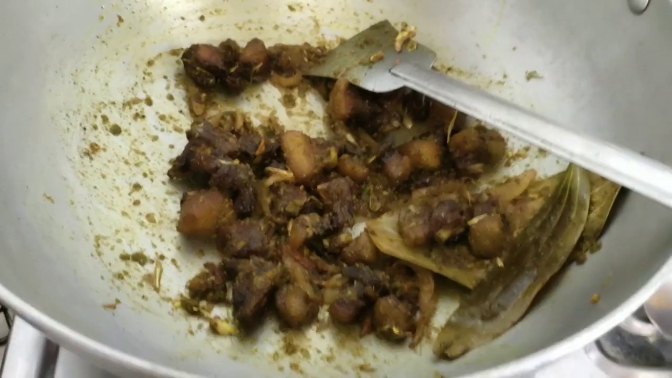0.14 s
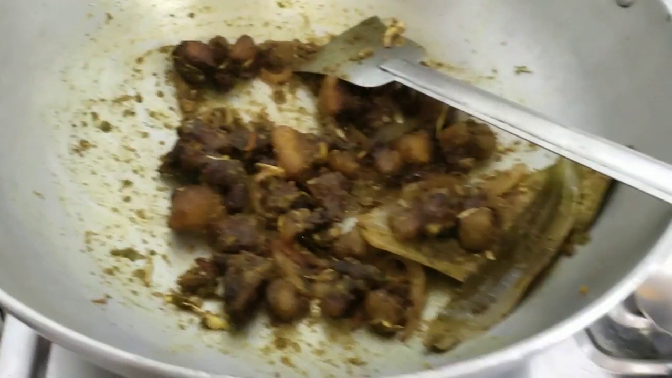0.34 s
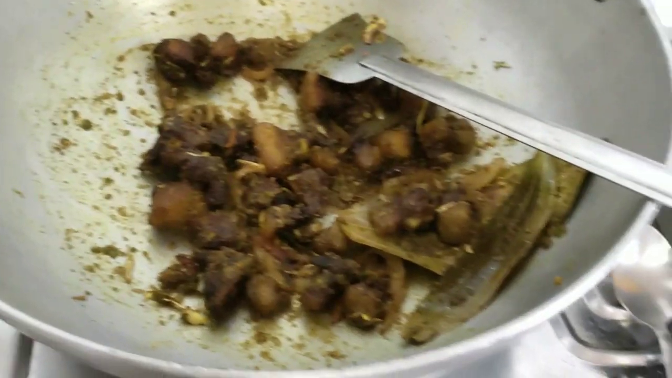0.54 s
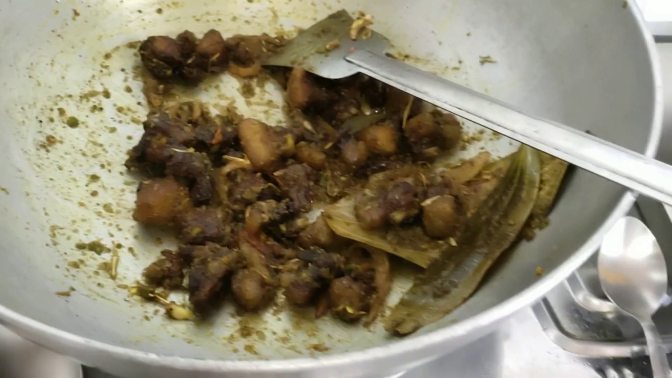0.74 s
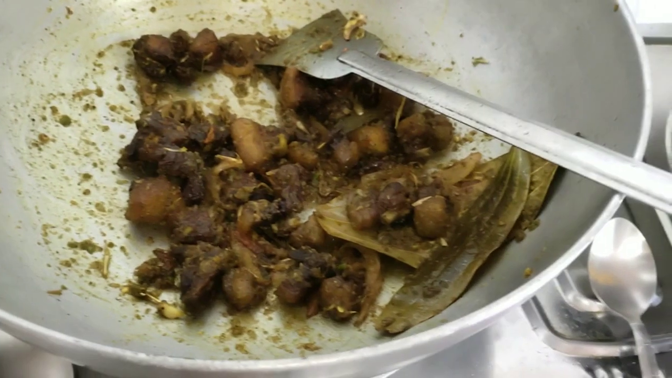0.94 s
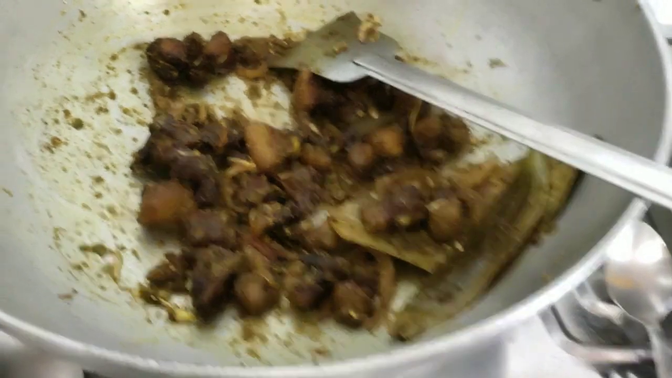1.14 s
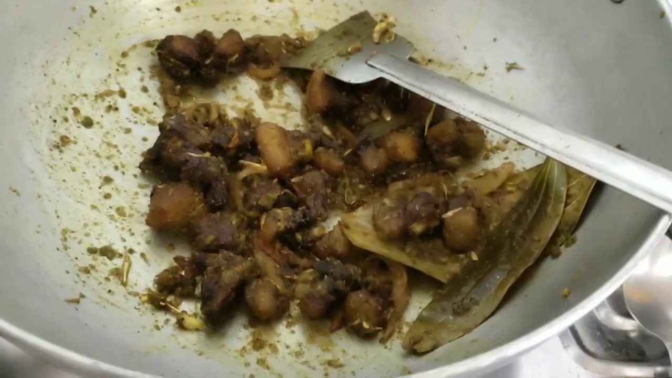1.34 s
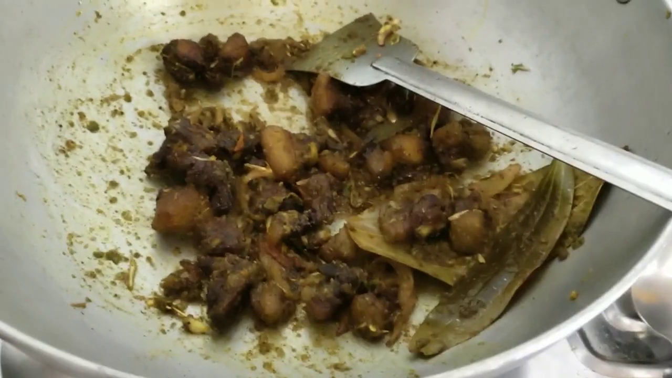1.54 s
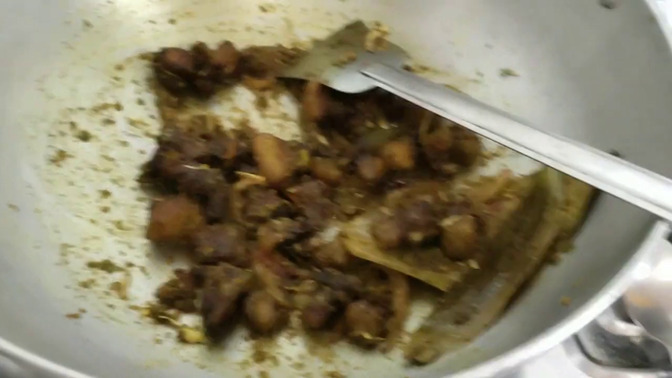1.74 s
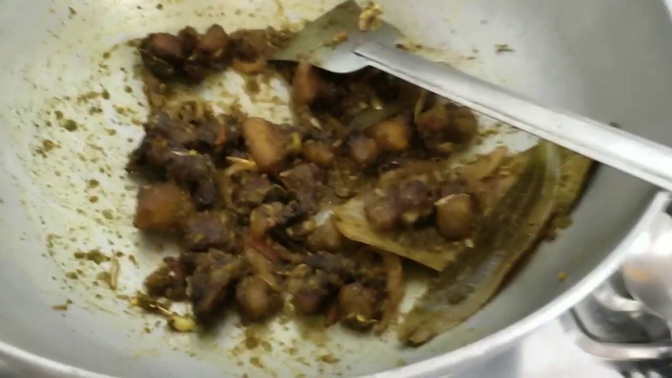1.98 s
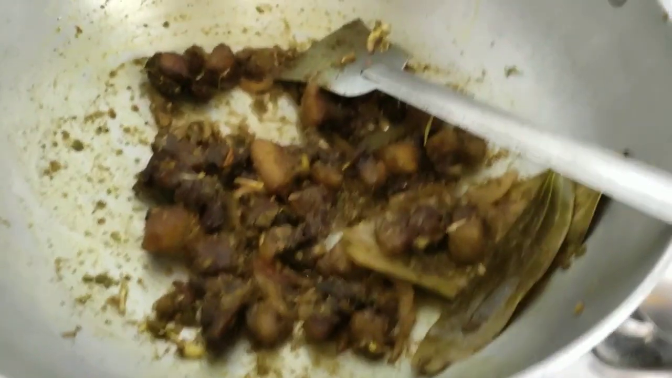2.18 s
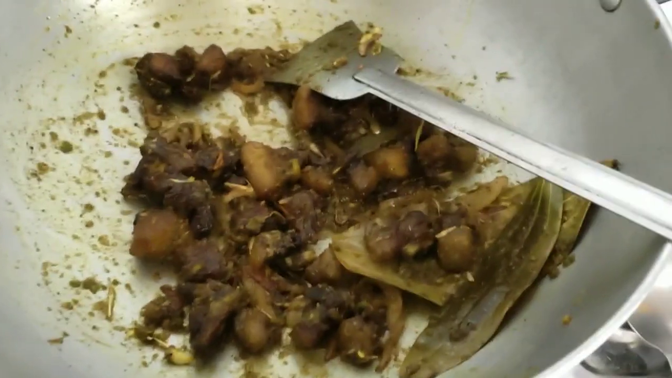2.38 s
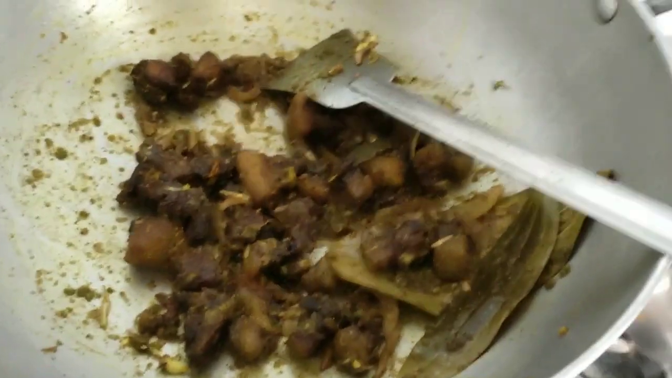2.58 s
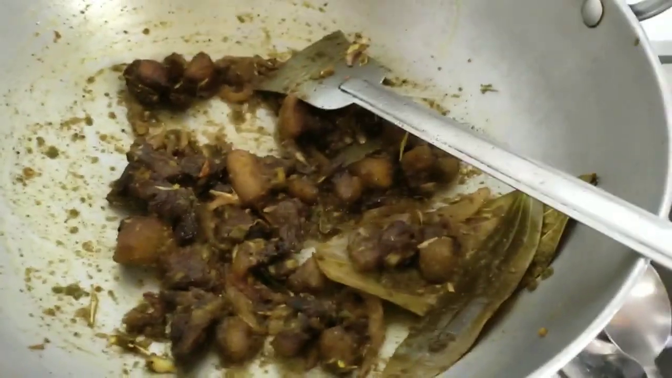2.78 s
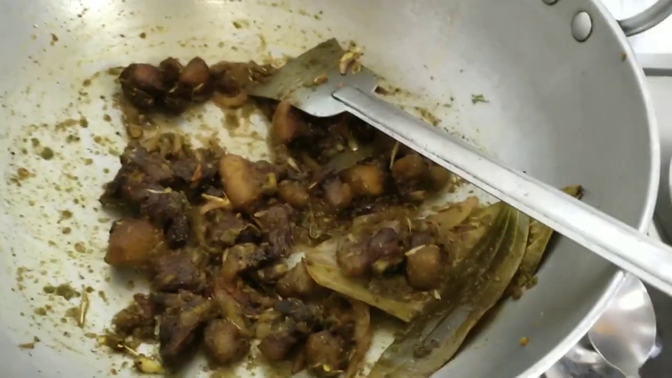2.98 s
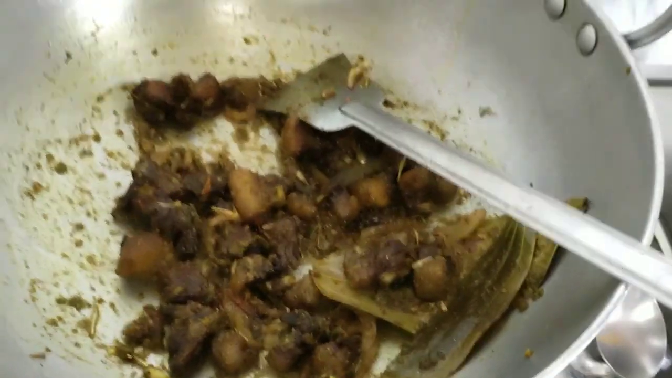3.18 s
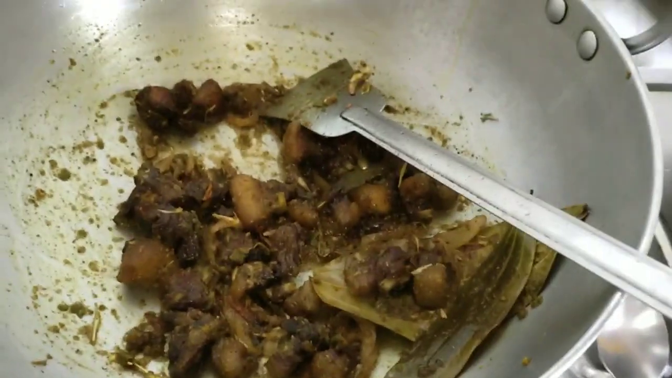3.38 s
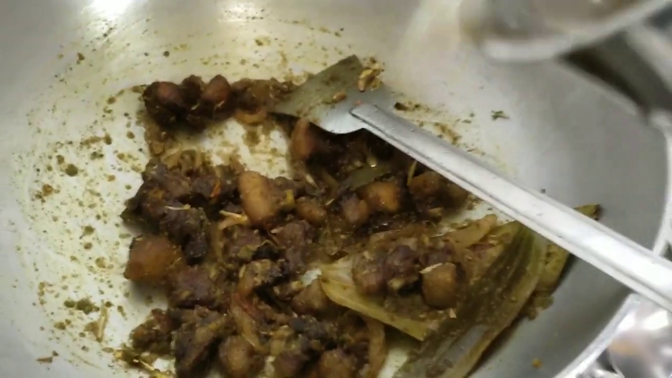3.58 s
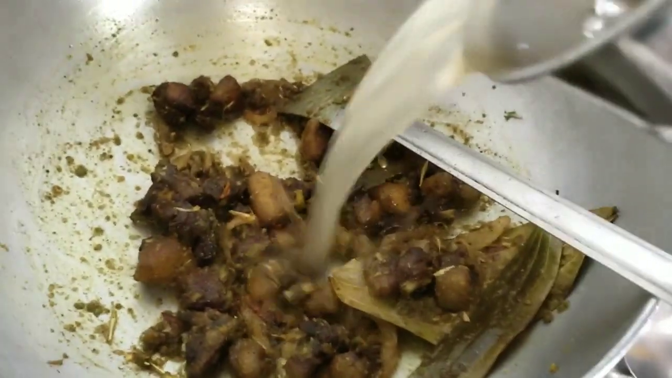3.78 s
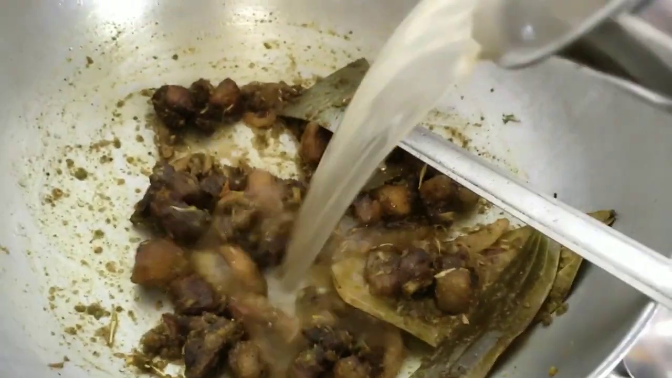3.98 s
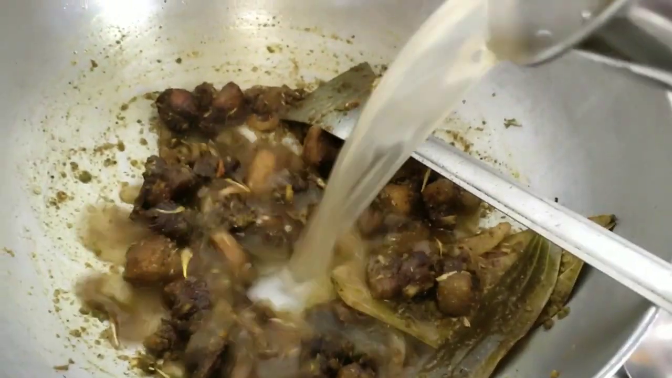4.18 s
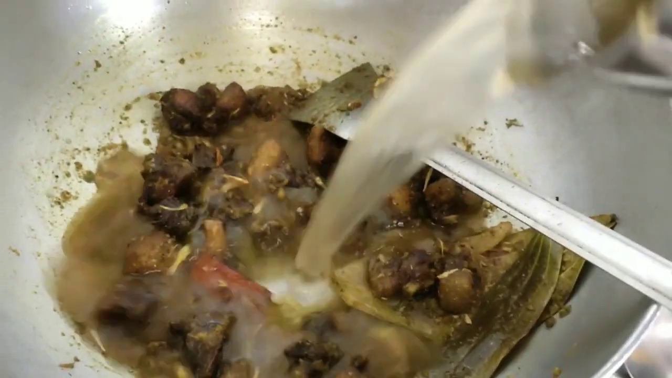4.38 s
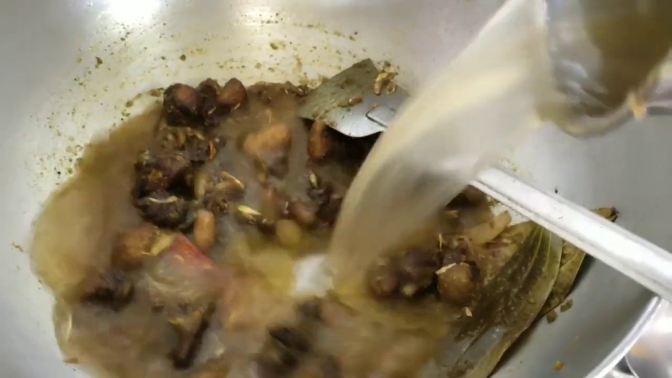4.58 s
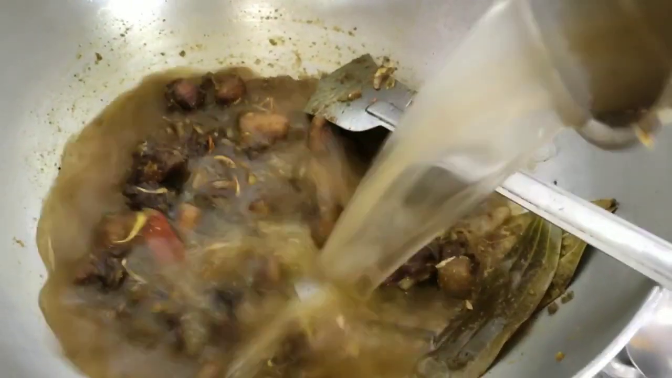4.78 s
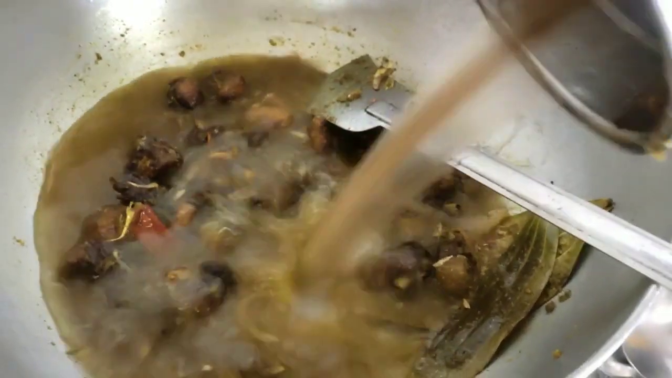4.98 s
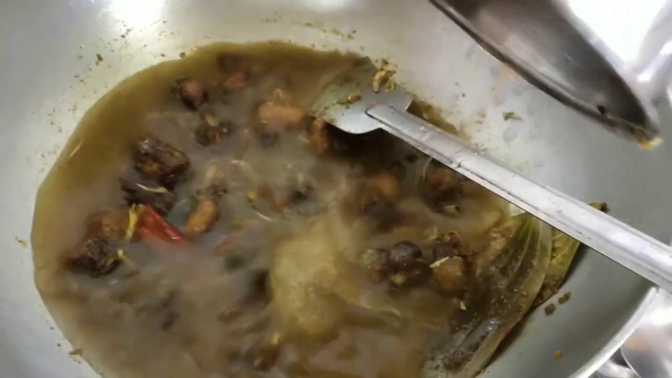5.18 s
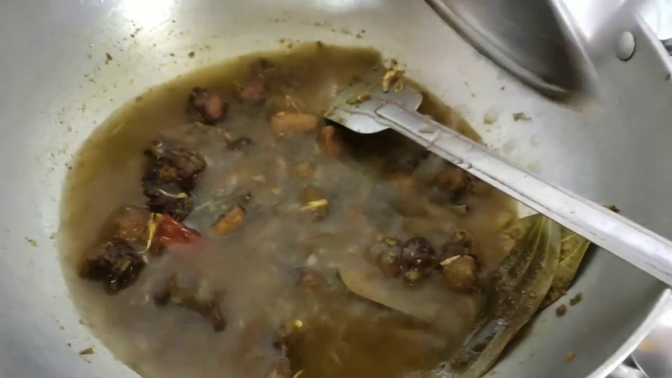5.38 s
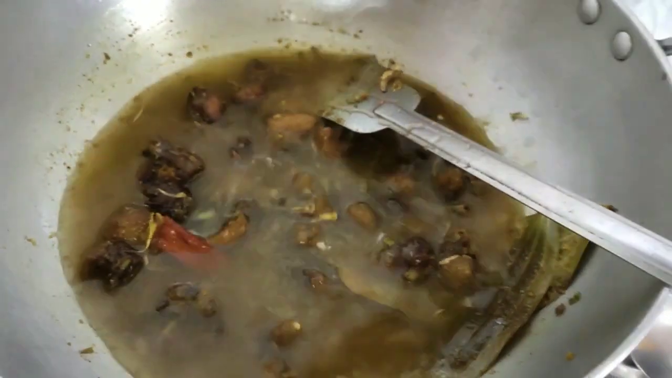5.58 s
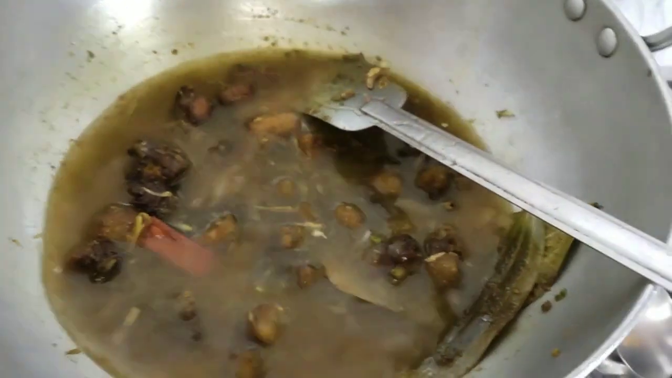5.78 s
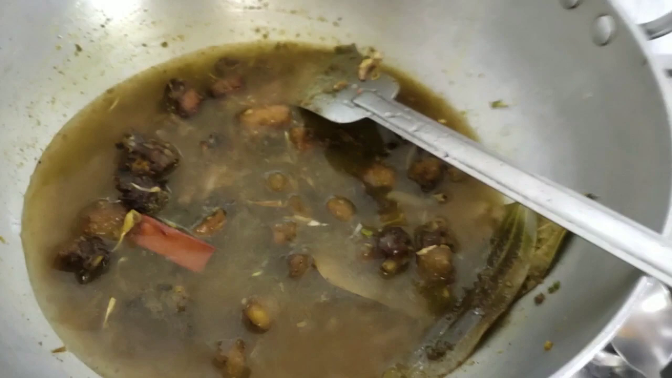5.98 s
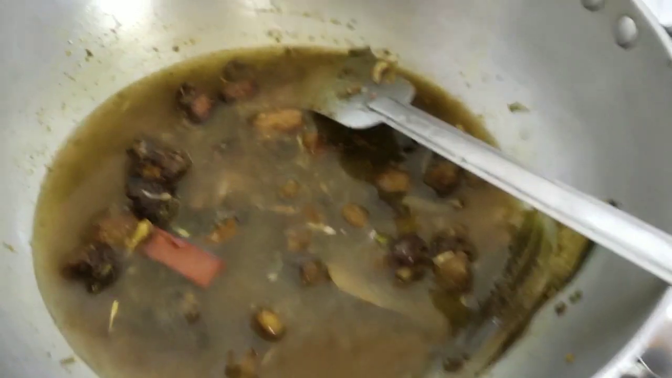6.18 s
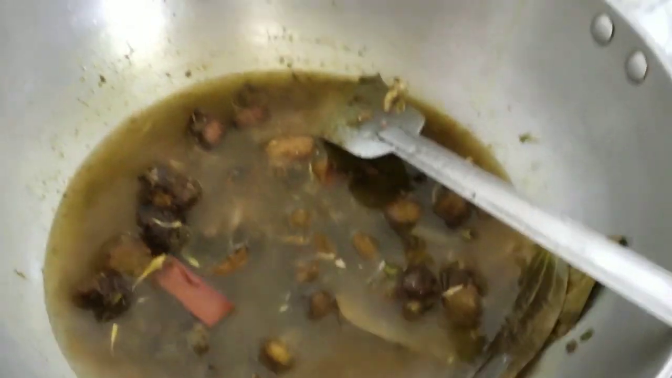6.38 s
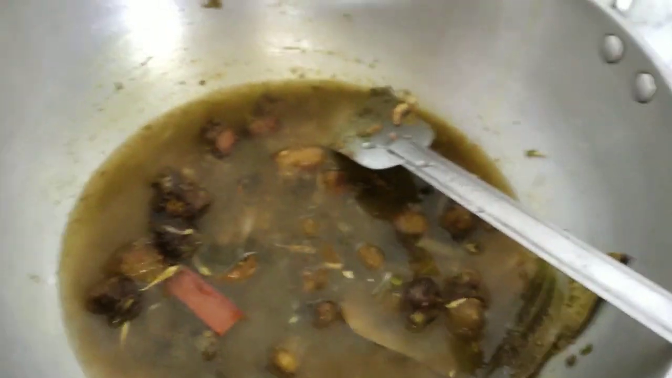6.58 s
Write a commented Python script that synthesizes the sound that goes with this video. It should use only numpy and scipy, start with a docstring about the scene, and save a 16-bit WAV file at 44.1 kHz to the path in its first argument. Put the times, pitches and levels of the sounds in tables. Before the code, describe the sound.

A steel pot clangs and scrapes beside quietly frying meat, then poured water bursts into a loud sizzling hiss that settles into bubbling.

```python
"""A steel pot clangs, is put down, dragged and lifted beside pork frying quietly in a metal wok on gas.
Blows excite clusters of decaying modes and noise bursts; dragging drives base resonances with random slips.
Fat pops are filtered impulses and short rings, over a low stove rumble, room tone and faint hums.
Then the pot's water splashes in, flashes into loud filtered-noise steam and boils as ringing bubbles,
which settle towards a simmer. Small hard-walled kitchen, one close microphone."""
import sys
import numpy as np
from scipy import signal
from scipy.fft import rfft, irfft
from scipy.io import wavfile

SR = 44100
rng = np.random.default_rng(int(sys.argv[2]) if len(sys.argv) > 2 else 0)


def dump(signal):
    """Clip the signal to [-1, 1] and save it as 16-bit WAV at the path in sys.argv[1]."""
    limited = np.clip(np.atleast_2d(signal).T, -1, 1)
    pcm = np.round(limited * 32767).astype(np.int16)
    wavfile.write(sys.argv[1], SR, pcm)


N = 292691
TIME = np.arange(N) / SR


def from_db(db):
    """Decibels to gain."""
    return 10 ** (np.asarray(db) / 20)


def rms_one(x):
    """Scale to unit power."""
    return x / np.sqrt(np.mean(x ** 2) + 1e-20)


def at_hz(points, hz):
    """Read a table on a log-frequency axis."""
    f, value = np.transpose(points)
    return np.interp(np.log(np.maximum(hz, 1)), np.log(f), value)


def since(start_s):
    """Seconds gone by since a moment, zero before it."""
    return np.maximum(TIME - start_s, 0)


def ramp(start_s, takes_s):
    """Straight rise from 0 to 1."""
    return np.minimum(since(start_s) / takes_s, 1)


def drift(turns_per_s):
    """Slow random curve of spread 1."""
    knots = rng.standard_normal(4000)
    return np.interp(TIME * turns_per_s, np.arange(len(knots)), knots) * np.sqrt(3 / 2)


def through(x, response):
    """Pass a sound through an impulse response."""
    return signal.oaconvolve(x, response)[:N]


def colour(x, spectrum, size=4096):
    """Causal (minimum-phase) filter of unit energy with the given spectrum."""
    log_gain = np.log(from_db(at_hz(spectrum, np.fft.rfftfreq(size, 1 / SR))))
    cepstrum = irfft(log_gain)
    cepstrum[1:size // 2] *= 2
    cepstrum[size // 2 + 1:] = 0
    response = irfft(np.exp(rfft(cepstrum)))
    return through(x, response / np.linalg.norm(response))


def ring(x, hz, t60_s):
    """Decaying mode: a unit click sets a sine of height 1 ringing."""
    r, w = from_db(-60 / (t60_s * SR)), 2 * np.pi * hz / SR
    return signal.lfilter([0, np.sin(w)], [1, -2 * r * np.cos(w), r * r], x + 1e-18)


def resonance(x, hz, width_hz):
    """Band-pass with gain 1 on top."""
    r = np.exp(-np.pi * width_hz / SR)
    zeros = np.array([1, 0, -1]) * (1 - r * r) / 2
    poles = [1, -2 * r * np.cos(2 * np.pi * hz / SR), r * r]
    return signal.lfilter(zeros, poles, x + 1e-18)


def high_pass(order, hz):
    """Butterworth high-pass sections."""
    return signal.butter(order, hz, "high", fs=SR, output="sos")


def clicks(times_s, levels_db):
    """One impulse for each event."""
    out = np.zeros(N)
    at = np.round(np.asarray(times_s) * SR).astype(int)
    out[np.clip(at, 0, N - 1)] = from_db(levels_db)
    return out


def burst(t60_s):
    """Dense train of dying echoes with unit energy."""
    noise = rng.standard_normal(SR) * from_db(-60 * TIME[:SR] / t60_s)
    return noise / np.linalg.norm(noise)


def rattle(times_s, levels_db, t60_s):
    """Each event sets off a dying noise burst with the energy of its level."""
    r = from_db(-120 / (t60_s * SR))
    power = signal.lfilter([1 - r], [1, -r], clicks(times_s, levels_db) ** 2 + 1e-18)
    return np.sqrt(power) * rng.standard_normal(N)


def grains(per_s, spread_db, largest=3.4):
    """Random pops, many small and a few large; rms 1."""
    sizes = from_db(spread_db * np.minimum(rng.exponential(1, N), largest))
    signed = sizes * rng.choice([-1, 1], N)
    return rms_one(signed * (rng.random(N) < per_s / SR))


def bubbles(per_s, spread_db, cycles, low_hz, high_hz, count):
    """Pops ring a few cycles at one of many pitches, evenly bright overall; rms 1."""
    out = np.zeros(N)
    for hz in np.geomspace(low_hz, high_hz, count):
        pops = grains(per_s / count, spread_db)
        out += np.sqrt(hz) * rms_one(ring(pops, hz, cycles / hz))
    return rms_one(out)


def sizzle(pops, spectrum, wash_db, wet_db=-4.5):
    """Pops all over the wok; most of their reflections blur into a smooth wash; rms 1."""
    near = through(pops, burst(t60_s=0.08))  # short echo off the bowl
    wash = from_db(wash_db) * rng.standard_normal(N)
    return rms_one(colour(pops + from_db(wet_db) * near + wash, spectrum))


# reverberation: (frequency [Hz], decay time t60 [s])
KITCHEN_T60 = [(100, 0.59), (500, 0.6), (2500, 0.45), (7000, 0.43), (15000, 0.26)]


def kitchen(x, wet_db, first_echo_s=0.005):
    """Hard walls add a diffuse tail to the direct sound; its treble dies first."""
    hz, noise = np.fft.rfftfreq(SR, 1 / SR), rfft(rng.standard_normal(SR))
    centres_hz, t = np.transpose(KITCHEN_T60)[0], TIME[:SR]
    tail = 0
    for (_, t60_s), share in zip(KITCHEN_T60, np.eye(len(centres_hz))):
        band = irfft(noise * at_hz(np.c_[centres_hz, share], hz), SR)
        tail = tail + band * from_db(-60 * t / t60_s)
    tail = tail * (t > first_echo_s)
    return x + from_db(wet_db) * through(x, tail / np.linalg.norm(tail))


# pot mode clusters: (frequency [Hz], cluster width [Hz], relative level [dB], decay time t60 [s])
POT_MODES = [(204, 12, -21.5, 0.8), (316, 52, -18, 0.89), (585, 70, -19, 0.95), (942, 7.6, -11.5, 0.62),
             (1540, 10, -22.5, 0.68), (1944, 49.4, -11, 0.76), (2106, 77, -1, 0.56), (2223, 21, -6, 0.72),
             (2443, 82, -11.5, 0.9), (2550, 49, -9, 0.65), (3090, 40, -17, 0.64), (3330, 45, -5.5, 0.5),
             (3580, 75, -6, 0.54), (3800, 100, -24, 0.53), (4400, 46, -22, 0.46), (4740, 58, -19, 0.63),
             (4270, 100, -25, 0.62), (4735, 37, -15, 0.76), (5510, 41, -15, 0.71), (6370, 32, -39, .38),
             (7600, 56, -26, .4), (7400, 34, -21.5, .35), (9400, 110, -33, 0.11), (9600, 81, -8.5, .33)]


def pot_ring(times_s, ring_db, count=5):
    """Nearly equal modes beat; every blow shares its force among them anew."""
    out = np.zeros(N)
    for hz, width_hz, db, t60_s in POT_MODES:
        for offset in np.linspace(-0.5, 0.5, count) + rng.uniform(-0.1, 0.1, count):
            delays_s = rng.uniform(0, 0.004, len(times_s))
            strengths_db = ring_db + db + 2 * rng.standard_normal(len(times_s))
            out += ring(clicks(times_s + delays_s, strengths_db), hz + width_hz * offset, t60_s)
    return out / np.sqrt(count)


# blows on the pot, relative levels:
# (time [s], ring [dB], crack [dB], dull clunk [dB], hollow note [dB])
BLOWS = [(0.0, -24, -5, -14.5, -48), (0.019, -28.5, -8, -12.5, -30.5), (0.2152, -21, -1.5, -8, -30.5),
         (0.6063, -38, -3, -0.5, -39), (0.618, -50, -18, 1.5, -54), (0.721, -56, -21, -17, -61),
         (0.762, -58, -25, -4.5, -46), (0.791, -62, -34, -11, -31), (0.883, -66, -48, -34, -47)]
# crack and clunk spectra: (frequency [Hz], relative density [dB per Hz])
CRACK_SPECTRUM = [(200, -14), (1200, -19.5), (2200, 9.5), (4200, 3), (5300, 2), (6000, -5), (8000, -1.5),
                  (9500, -0.5), (10500, -2.5), (11500, -2.5), (14000, 4), (16000, 1)]
CLUNK_SPECTRUM = [(40, -47), (75, -35), (130, -4.5), (185, -22), (290, -1.5), (450, -3), (620, 0.5),
                  (1150, -1), (1700, -1), (3000, -8.5), (4600, -11), (6100, -19.5), (8300, -10),
                  (10700, -20), (15500, -25)]
HOLLOW_HZ, HOLLOW_T60_S = 419.5, 0.51  # a lone low mode
CONTACT_DB = -7.5  # first metal contact, relative to the crack


def pot_blows():
    """Each contact cracks, rings the steel and thumps whatever the pot stands on."""
    s, ring_db, crack_db, clunk_db, hollow_db = np.transpose(BLOWS)
    contact = clicks(s, crack_db + CONTACT_DB)
    crack = colour(rattle(s, crack_db, t60_s=0.041) + contact, CRACK_SPECTRUM)
    clunk = colour(rattle(s, clunk_db, t60_s=0.24), CLUNK_SPECTRUM)
    hollow = ring(clicks(s, hollow_db), HOLLOW_HZ, HOLLOW_T60_S)
    steel = hollow + from_db(-3.5) * pot_ring(s, ring_db)
    crack = from_db(12) * kitchen(crack, wet_db=-4)
    return steel + crack + from_db(7) * kitchen(clunk, wet_db=-6.5)


# slides of the pot on its base: (time [s], length [s], final level [dB])
SLIDES = [(0.0, 0.095, -36), (0.794, 0.0092, -35.5), (1.0, 0.03, -60), (1.495, 0.23, -38)]
SLIDE_GRIP_DB_PER_S, SLIDE_SWELL_DB_PER_S, SLIDE_STOP_DB_PER_S = 1100, 61, 300


def sliding():
    """Friction gain: each slide grips quickly, presses harder and stops short."""
    gain = 0
    for s, length_s, db in SLIDES:
        grip_db = SLIDE_GRIP_DB_PER_S * np.maximum(s - TIME, 0)
        swell_db = SLIDE_SWELL_DB_PER_S * np.maximum(s + length_s - TIME, 0)
        stop_db = SLIDE_STOP_DB_PER_S * since(s + length_s)
        gain = gain + from_db(db - grip_db - swell_db - stop_db)
    return gain + 1e-18


# modes of the pot resting on its base: (frequency [Hz], width [Hz], relative level [dB])
BASE_MODES = [(315.5, 20, -5.5), (444, 38, 1), (618, 48, -10.5), (837, 39, -4.5), (1056, 44, -25.5),
              (1440, 100, -17.5), (3150, 500, -36.5)]


def pot_drag():
    """The base sticks and slips unevenly, which makes the pot groan."""
    slips = grains(per_s=700, spread_db=3.5)
    groan = rms_one(sum(from_db(db) * resonance(slips, hz, width) for hz, width, db in BASE_MODES))
    return kitchen(groan * sliding(), wet_db=-8.5)


# frying spectrum: (frequency [Hz], relative density [dB per Hz])
FAT_SPECTRUM = [(300, -48), (550, -32), (800, -27), (1100, -11.5), (1400, -10.5), (1850, -4), (3000, -2),
                (4500, -2.5), (6100, -11), (7500, -2), (8900, 2), (10700, -8), (12500, -2.5), (15500, 0.5)]
# steady until the rising water covers all but the rim of the fat
FRY_DB, FRY_COVERED_S, FRY_COVER_TAKES_S, FRY_COVER_LOSS_DB = -37.5, 4.0, 0.6, 14


def frying():
    """Tiny steam pockets burst in the fat, as dry clicks and short rings."""
    dry_pops = grains(per_s=2400, spread_db=3.5, largest=5.0)
    ringing = bubbles(per_s=2200, spread_db=2.5, cycles=39.0, low_hz=1473, high_hz=15930, count=36)
    pops = dry_pops + from_db(-1.5) * ringing
    fry_db = FRY_DB - FRY_COVER_LOSS_DB * ramp(FRY_COVERED_S, FRY_COVER_TAKES_S)
    return sizzle(pops, FAT_SPECTRUM, wash_db=2.0) * from_db(fry_db + 0.27 * drift(30.14))


# stove rumble spectrum: (frequency [Hz], relative density [dB per Hz])
FLAME_SPECTRUM = [(25, 6.5), (55, -19), (100, 2), (120, -8), (138, 6.5), (170, -14), (300, -21), (700, -21),
                  (2000, -37.5)]
# rumble at rest, and relative to the blows, slides and bubbling that shake it
STOVE_DB, STOVE_BLOW_DB, STOVE_SLIDE_DB, STOVE_BOIL_DB = -87.5, -46.5, -18, -19
STOVE_FOLLOWS_BLOW, STOVE_FALL_DB_PER_S = 0.35, 32.5  # share of crack dB followed; decay


def stove_shake():
    """Rumble gain, raised by blows, slides and the bubbling pool."""
    s, _, crack_db, _, _ = np.transpose(BLOWS)
    knocks = []
    for at_s, db in zip(s, crack_db):
        knock_db = STOVE_BLOW_DB + STOVE_FOLLOWS_BLOW * db - STOVE_FALL_DB_PER_S * since(at_s)
        knocks.append((TIME >= at_s) * from_db(knock_db))
    dragged = from_db(STOVE_SLIDE_DB) * sliding()
    boiling_db = STOVE_BOIL_DB + LOW_DB + build_up(LOW_RISE_DB, LOW_RISE_S)
    boiling = from_db(boiling_db) * ramp(WATER_LANDS_S, WETTING_S)
    return np.sqrt(from_db(STOVE_DB) ** 2 + np.max(knocks, axis=0) ** 2 + dragged ** 2 + boiling ** 2)


def stove_rumble():
    """Low-coloured noise, louder while the stove is shaken."""
    return rms_one(colour(rng.standard_normal(N), FLAME_SPECTRUM)) * stove_shake()


# room tone spectrum: (frequency [Hz], relative density [dB per Hz])
ROOM_SPECTRUM = [(30, 0), (100, -16.5), (400, -24), (2000, -35.5)]
ROOM_TONE_DB = -74.5


def room_tone():
    """The quiet of the kitchen: steady, bass-heavy noise."""
    return from_db(ROOM_TONE_DB) * rms_one(colour(rng.standard_normal(N), ROOM_SPECTRUM))


# single spits of fat: (time [s], relative level [dB], treble over middle [dB])
SPITS = [(0.204, -20, -14), (0.867, -19, 11), (1.091, -18, 15), (2.013, -23, -13), (2.1337, -17, 3),
         (2.361, -16.5, 6), (2.774, -13.5, 0), (2.82, -15.5, 10), (3.19, -24, -16), (3.371, -19.5, -6),
         (3.3878, -15, 4), (3.4962, -17, 3), (3.53, -17, 8), (3.574, -15.5, 2)]


def spits():
    """Larger bursts of fat, each a short noise in a middle and a treble band."""
    s, db, bright_db = np.transpose(SPITS)
    middle = resonance(rattle(s, db - bright_db / 2, t60_s=0.009), 3300, 2200)
    treble = resonance(rattle(s, db + bright_db / 2, t60_s=0.010), 11700, 6000)
    return from_db(9.0) * kitchen(colour(middle + treble, FAT_SPECTRUM), wet_db=-4)


# faint low hums: (time [s], length [s], frequency [Hz], level before fading in and out [dB])
HUMS = [(1.88, 0.35, 298, -67.5), (2.14, 0.47, 730, -74.5), (2.667, 0.52, 747, -70.5),
        (2.74, 0.1, 109, -78), (2.895, 0.16, 855, -62), (3.05, 0.4, 105, -72), (3.537, 0.25, 290, -67),
        (3.55, 0.36, 110, -69)]


def hums():
    """Narrow-band noise swells and fades along half a sine."""
    out = np.zeros(N)
    for s, length_s, hz, db in HUMS:
        tone = rms_one(resonance(resonance(rng.standard_normal(N), hz, 55), hz, 55))
        out += from_db(db) * tone * np.sin(np.pi * np.clip((TIME - s) / length_s, 0, 1))
    return out


WATER_LANDS_S, WETTING_S = 3.711, 0.029


def build_up(rise_db, rise_s):
    """Level in dB that climbs to 0 once the water has landed."""
    return rise_db * (ramp(WATER_LANDS_S, rise_s) - 1)


def swell(rise_db, rise_s, hold_s, fall_db_per_s):
    """Attack, hold and release in dB, counted from the water's landing."""
    return build_up(rise_db, rise_s) - fall_db_per_s * since(WATER_LANDS_S + rise_s + hold_s)


# splash spectrum: (frequency [Hz], relative density [dB per Hz])
DROPLET_SPECTRUM = [(900, -43), (2500, -10), (4200, 3), (5300, 3.5), (6100, -5), (7400, -1), (9500, -12),
                    (15000, -29)]
SPLASH_DB, SPLASH_RISE_DB, SPLASH_RISE_S = -27.5, 15, 0.29
SPLASH_HOLD_S, SPLASH_FALL_DB_PER_S = 0.38, 20


def stream_level():
    """The stream splashes on bare metal, then is cushioned by the pool; dB."""
    return swell(SPLASH_RISE_DB, SPLASH_RISE_S, SPLASH_HOLD_S, SPLASH_FALL_DB_PER_S)


def splash(stream_db):
    """Droplets of many sizes strike as coloured pops."""
    drops = sizzle(grains(per_s=5000, spread_db=6.0), DROPLET_SPECTRUM, wash_db=-17)
    return drops * from_db(SPLASH_DB + stream_db + 0.71 * drift(21.97))


# steam spectrum: (frequency [Hz], relative density [dB per Hz])
STEAM_SPECTRUM = [(530, -55), (1000, -38), (1500, -18), (2300, -8), (3000, -6), (4400, -6.5), (6100, -12),
                  (7500, 1), (8300, -0.5), (9300, -0.5), (10700, -8.5), (12500, -7.5), (15000, -3),
                  (15600, -17.5)]
# builds on the hot spot, drops when it is quenched, fades as the metal cools
STEAM_DB, STEAM_RISE_DB, STEAM_RISE_S = -17.5, 7, 0.27
QUENCH_S, QUENCH_TAKES_S, QUENCH_LOSS_DB, COOLING_DB_PER_S = 4.31, 0.18, 5.5, 8
# finest spray: top-octave lift, extra at first touch, loss under full splashing
SPRAY_FROM_HZ, SPRAY_DB, FIRST_SPRAY_DB, FIRST_SPRAY_S, SMOTHER_DB = 9700, 2.5, 5, 0.95, 7


def steam_level():
    """Flash, quench and slow cooling, in dB."""
    quench_db = QUENCH_LOSS_DB * ramp(QUENCH_S, QUENCH_TAKES_S)
    cooling_db = COOLING_DB_PER_S * since(QUENCH_S)
    return STEAM_DB + build_up(STEAM_RISE_DB, STEAM_RISE_S) - quench_db - cooling_db


def steam(stream_db):
    """Water flashes on hot metal; the splashing smothers the finest spray."""
    first_db = FIRST_SPRAY_DB * (1 - ramp(WATER_LANDS_S, FIRST_SPRAY_S))
    spray_db = SPRAY_DB + first_db - SMOTHER_DB * from_db(stream_db)
    hiss = sizzle(grains(per_s=12000, spread_db=4.0), STEAM_SPECTRUM, wash_db=-3.0)
    top = signal.sosfiltfilt(high_pass(3, SPRAY_FROM_HZ), hiss)
    return (hiss + top * (from_db(spray_db) - 1)) * from_db(steam_level() + 0.71 * drift(35))


# the last of the water leaves the pot in one gush, which stirs up the pool
GUSH_S, GUSH_WIDTH_S, GUSH_DB = 4.89, 0.19, 2


def gush():
    """Brief hump in dB as the pot is tipped right over."""
    return GUSH_DB * np.exp(-((TIME - GUSH_S) / GUSH_WIDTH_S) ** 2)


# boil spectrum: (frequency [Hz], relative density [dB per Hz])
BOIL_SPECTRUM = [(400, -33.5), (800, -8), (1300, -6), (1700, -0.5), (2700, 1.5), (4500, -1), (6000, -17),
                 (8000, -13), (15000, -27)]
BOIL_DB, BOIL_RISE_DB, BOIL_RISE_S = -26.5, 17.5, 0.54
SETTLE_FROM_S, SETTLE_TIME_S, SIMMER_LOSS_DB = 4.81, 1.24, 12.5


def boil_level():
    """Builds as the pool forms, holds, then relaxes towards a simmer; dB."""
    settled = 1 - np.exp(-since(SETTLE_FROM_S) / SETTLE_TIME_S)
    return BOIL_DB + build_up(BOIL_RISE_DB, BOIL_RISE_S) + gush() - SIMMER_LOSS_DB * settled


def boil():
    """Dense small bubbles ring at many pitches."""
    pops = bubbles(per_s=5200, spread_db=3.0, cycles=16.4, low_hz=562, high_hz=10460, count=48)
    return sizzle(pops, BOIL_SPECTRUM, wash_db=2.0) * from_db(boil_level() + 0.54 * drift(25))


# large-bubble spectrum: (frequency [Hz], relative density [dB per Hz])
BUBBLING_SPECTRUM = [(80, -53), (170, -16), (300, -14.5), (450, 2), (700, 6), (1000, 2), (1500, 6.5),
                     (3000, -50)]
# modes of the wok and the air in it: (frequency [Hz], width [Hz], relative level [dB])
WOK_MODES = [(223.3, 29, 11.5), (300, 17, 7.5), (424.6, 17, 9), (718, 21, -1), (1023, 62, 10),
             (1443, 51, 12.5)]
LOW_DB, LOW_RISE_DB, LOW_RISE_S, LOW_HOLD_S, LOW_FALL_DB_PER_S = -40, 23, 0.45, 1.14, 6


def low_bubbling():
    """Large bubbles need some depth of water, outlast the pour and shake the wok."""
    pops = bubbles(per_s=2000, spread_db=0.5, cycles=7.4, low_hz=157, high_hz=1755, count=28)
    low = sizzle(pops, BUBBLING_SPECTRUM, wash_db=2)
    shaken = sum(from_db(db) * resonance(low, hz, width) for hz, width, db in WOK_MODES)
    low_db = LOW_DB + swell(LOW_RISE_DB, LOW_RISE_S, LOW_HOLD_S, LOW_FALL_DB_PER_S)
    return rms_one(low + shaken) * from_db(low_db)


def water():
    """Splash and steam come first; as the pool deepens, larger and lower bubbles take over."""
    stream_db = stream_level()
    wetted = ramp(WATER_LANDS_S, WETTING_S)
    return wetted * (splash(stream_db) + steam(stream_db) + boil() + low_bubbling())


# large drops and bubbles in the broth: (time [s], level [dB], frequency [Hz])
PLOPS = [(3.746, -22, 2500), (3.819, -23, 3200), (6.157, -23.5, 3630), (6.444, -19, 3480),
         (6.516, -32, 1020)]


def plops():
    """A few large air pockets ring briefly."""
    cycles = 55.0  # ringing time to -60 dB
    pockets = sum(ring(clicks([s], [db]), hz, cycles / hz) for s, db, hz in PLOPS)
    return kitchen(pockets, wet_db=-9.0)


def scene():
    """Everything reaches one microphone, the same in both channels."""
    pot = pot_blows() + pot_drag()
    background = stove_rumble() + room_tone() + hums()
    mono = pot + frying() + spits() + background + water() + plops()
    return np.array([mono, mono])


BASS_CUT_HZ, CUTOFF_HZ = 97, 15550


def record(dry):
    """The small microphone loses the deep bass; peaks are rounded and the top is cut."""
    thin = signal.sosfilt(high_pass(2, BASS_CUT_HZ), dry)
    rounded = 0.91 * np.tanh(thin / 0.92)
    return signal.sosfilt(signal.ellip(14, 0.1, 70, CUTOFF_HZ, fs=SR, output="sos"), rounded)


dry = scene()
out = record(dry)
dump(out)
```